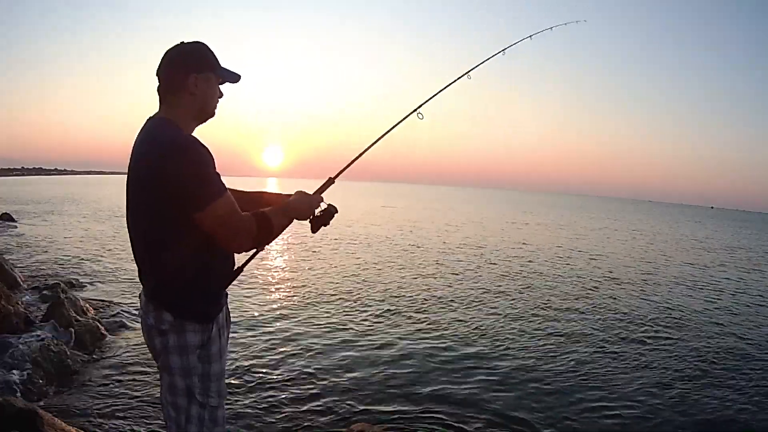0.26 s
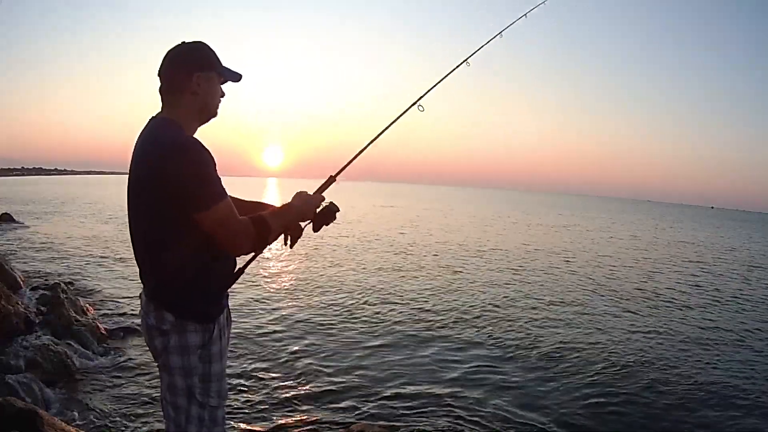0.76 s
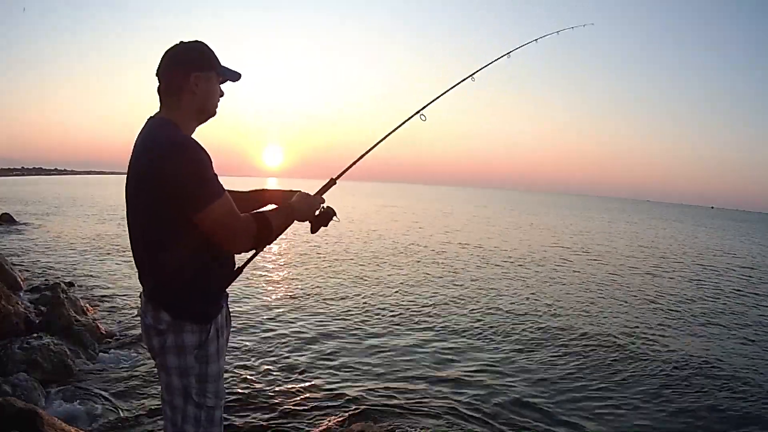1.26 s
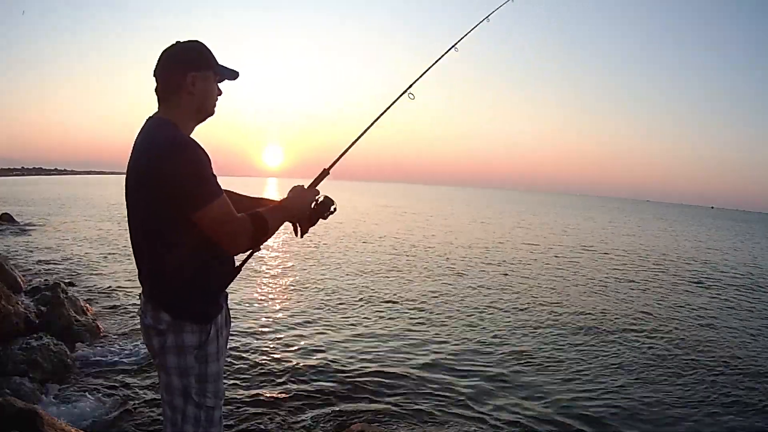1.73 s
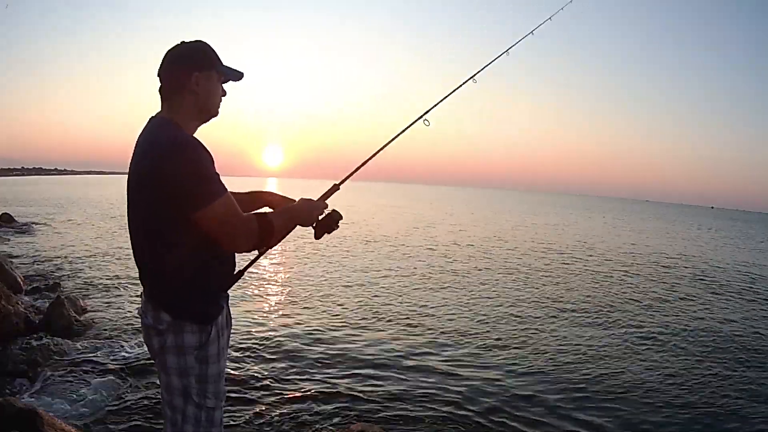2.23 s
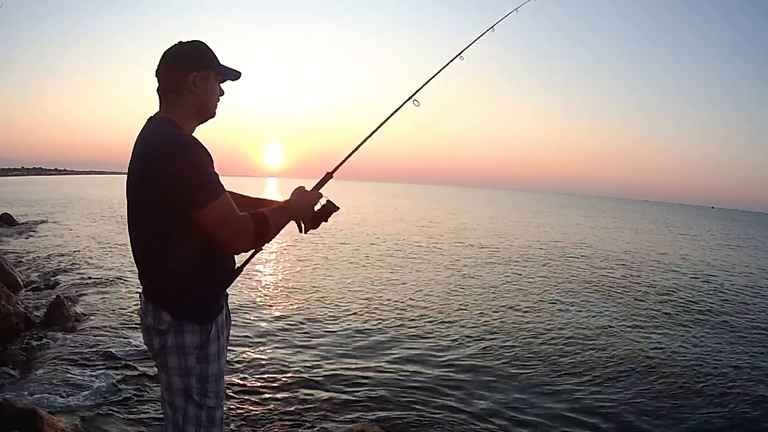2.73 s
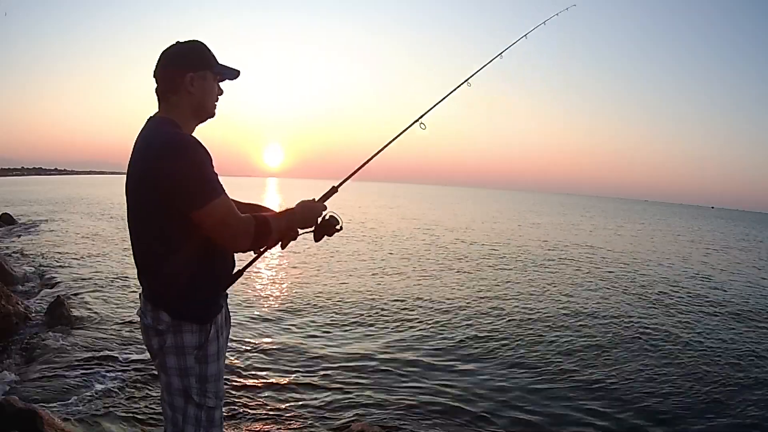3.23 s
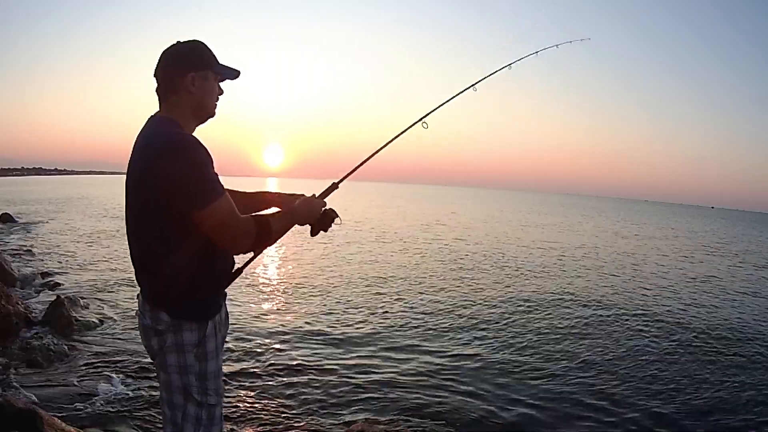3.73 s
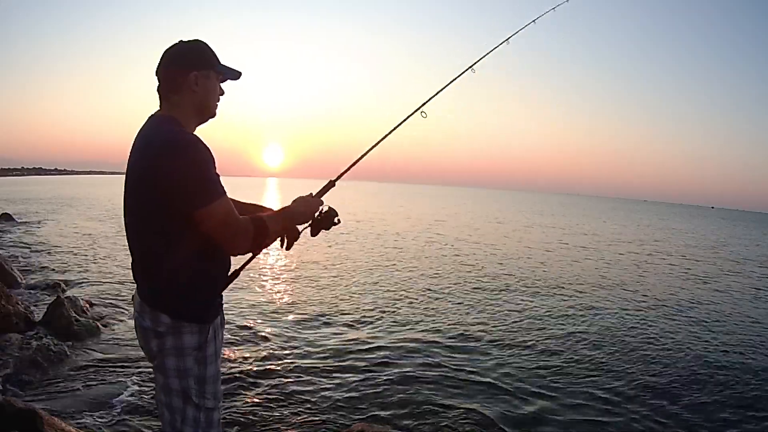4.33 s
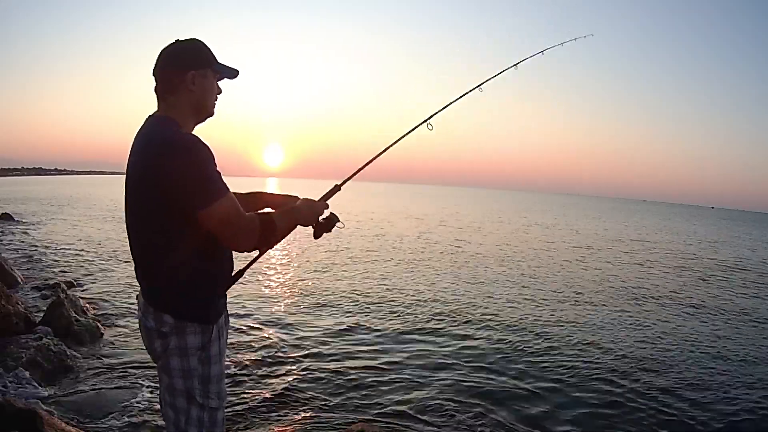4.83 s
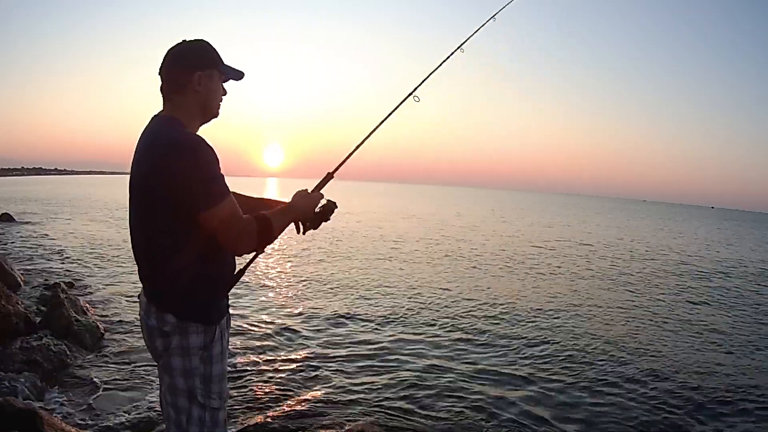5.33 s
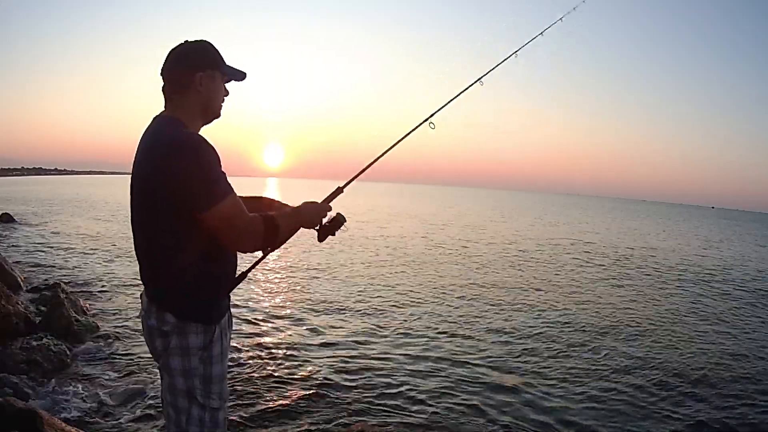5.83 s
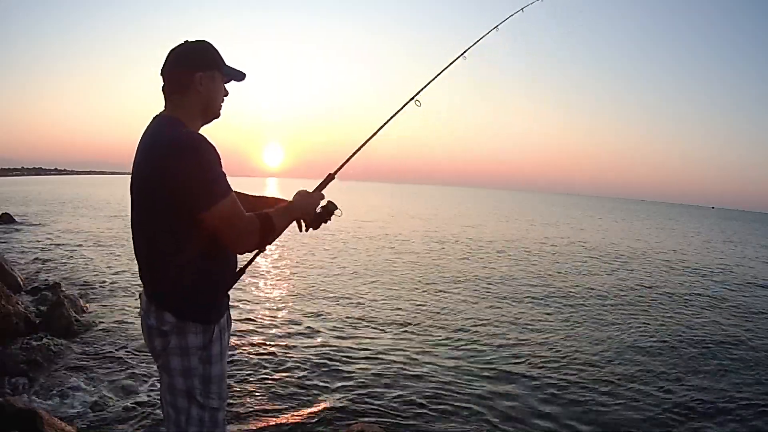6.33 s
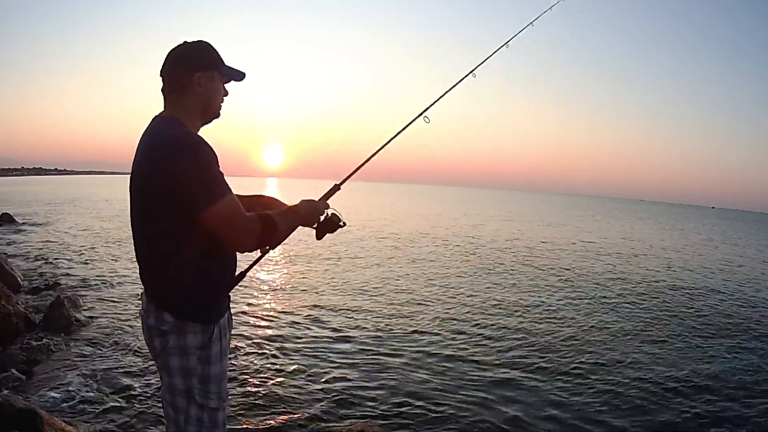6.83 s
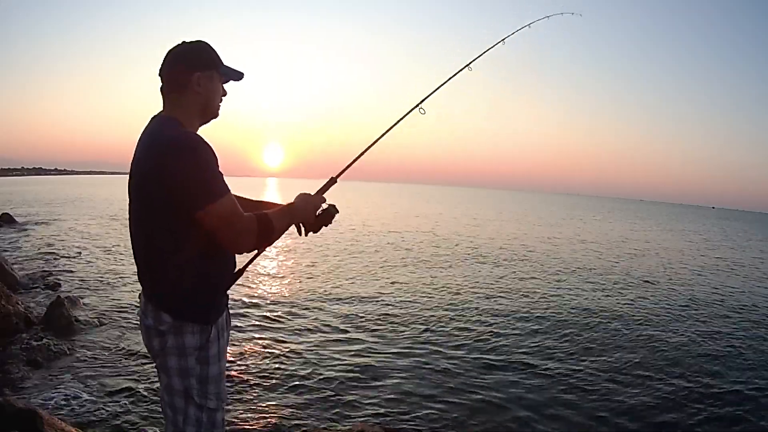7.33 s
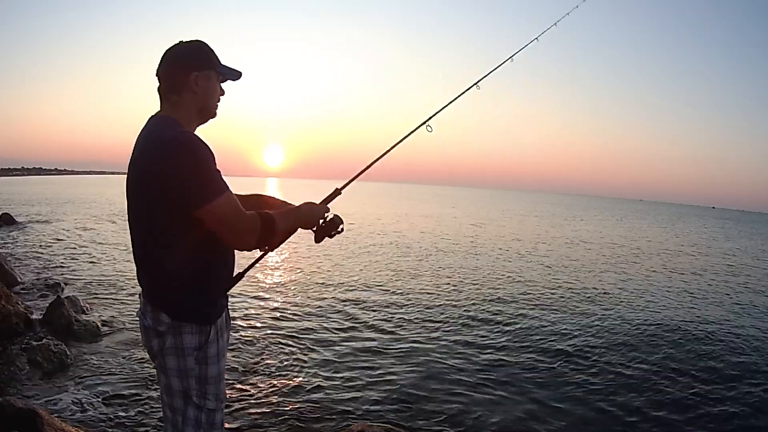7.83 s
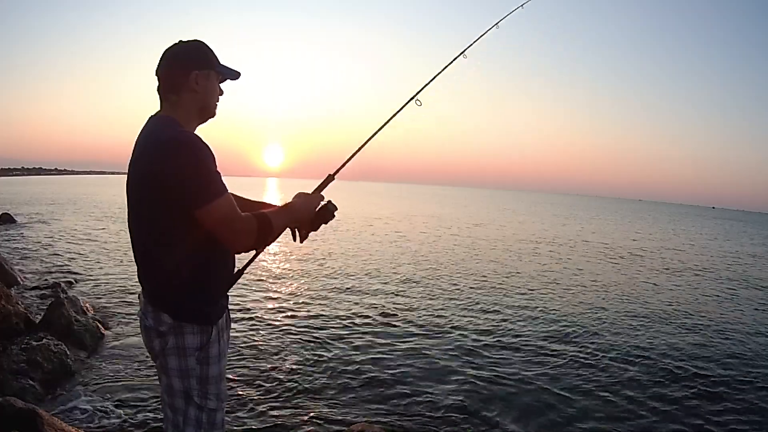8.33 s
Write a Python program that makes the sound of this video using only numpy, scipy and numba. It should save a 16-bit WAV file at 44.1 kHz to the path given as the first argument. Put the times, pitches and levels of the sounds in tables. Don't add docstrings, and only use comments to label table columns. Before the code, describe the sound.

Small waves lap on rocks close by in a continuous bubbly wash, coloured hollow around 900 Hz. Rounded plops, deeper gulps, drips and brief spray slaps come irregularly, thickest between two and four seconds and again around seven. The water thins near five seconds. A light breeze rumbles low on the boxed-in camera microphone. Outdoors, mono, slightly muffled.

```python
import sys
import numpy as np
from scipy import signal
from scipy.fft import rfft, irfft
from scipy.io import wavfile
from scipy.ndimage import uniform_filter1d, map_coordinates
from numba import njit

SR = 44100
rng = np.random.default_rng(int(sys.argv[2]) if len(sys.argv) > 2 else 0)


def gain_from_db(level_db):
    decades = np.asarray(level_db, float) / 20
    return 10 ** decades


def inscribe(sig):
    pcm = np.round(np.clip(np.atleast_2d(sig).T, -1, 1) * 32767)
    wavfile.write(sys.argv[1], SR, pcm.astype(np.int16))


N = 377919
TIME = np.arange(N) / SR
COARSE = 64


def unit(x):
    return x / np.sqrt(np.mean(x ** 2))


def columns(table):
    s, *values = np.transpose(table)
    return [np.interp(TIME, s, v) for v in values]


def bump(s, length_s):
    return .5 ** ((2 * (TIME[::COARSE] - s) / length_s) ** 2)


def full(x):
    return np.interp(TIME, TIME[::COARSE], x)


def walk(rate_hz):
    k = int(SR / rate_hz)
    held = np.repeat(rng.standard_normal(600), k)[:N]
    return unit(uniform_filter1d(uniform_filter1d(held, k), k))


def tint(x, points):
    hz, db = np.transpose(points)
    grid_hz = np.arange(2049) * SR / 4096 + 1
    cep = irfft(np.interp(np.log(grid_hz), np.log(hz), db) * np.log(10) / 20)
    cep[1:2048] *= 2
    cep[2049:] = 0
    return signal.fftconvolve(x, irfft(np.exp(rfft(cep))))[:N]


def band(x, lo_hz, hi_hz, order=2):
    return signal.sosfilt(signal.butter(order, [lo_hz, hi_hz], "band", fs=SR, output="sos"), x)


def even(x, share=.7, span_s=.11):
    span = int(span_s * SR)
    slow = uniform_filter1d(uniform_filter1d(x ** 2, span), int(span_s * SR / 2))
    return unit(x / (np.abs(slow) + 1e-12) ** (share / 2))


@njit
def ring(n, start, turn, cycles, rise, size, swell):
    out = np.zeros(n)
    for k in range(len(start)):
        phase, step, i = 0., turn[k], int(start[k])
        while phase < cycles[k] and i < n and step < .45:
            attack = np.sin(np.pi / 2 * min(phase / swell, 1.)) ** 2
            fade = np.exp(-5.76 * phase / cycles[k])
            out[i] += size[k] * attack * fade * np.sin(2 * np.pi * phase)
            phase += step
            step *= 1 + rise[k] * step
            i += 1
    return out


def bubbles(s, db, hz, cycles, rise):
    return ring(N, s * SR, hz / SR, np.clip(cycles, 1, 60), 1. * rise, gain_from_db(db), 1.28)


def hiss():
    return gain_from_db(-74) * rng.standard_normal(N)


# t/s, buffet level/dB, length/s, upper rumble re buffet/dB
GUSTS = [(.11, -39, 0.15, -12), (0.266, -41.5, .1, -12), (0.486, -49, .1, -20), (0.702, -40.5, 0.13, -11),
         (1.18, -44, .15, -8), (1.36, -49, 0.13, -5.5), (1.55, -44, 0.32, -16), (1.894, -45, 0.053, -11),
         (2.164, -40, 0.29, -7), (2.352, -42.5, 0.12, 1.5), (2.653, -38.5, 0.61, -9),
         (3.28, -39.5, 0.16, 1), (3.453, -39, 0.11, -13), (3.894, -41, 0.31, -12), (4.13, -37, 0.21, -4),
         (4.5, -40.5, 0.2, -10), (4.833, -39.5, .3, -15), (5.147, -54, 0.12, -14), (4.67, -42, 0.085, -3),
         (6.62, -49, .12, -3), (5.397, -51, 0.16, -11), (5.667, -37.5, 0.12, -14), (5.873, -34, 0.23, -8),
         (6.066, -37, 0.28, -14), (6.473, -47, 0.33, -7), (6.83, -48, 0.24, -8.5), (7.194, -43, 0.13, -20),
         (7.61, -50, .25, -13), (7.94, -49, 0.22, -15), (8.136, -60, 0.18, -7.5), (8.323, -41, 0.075, 1.5),
         (8.46, -50, 0.31, -3)]
# t/s, depth/dB, width/s
DENTS = [
    (.69, -23.5, 0.015),
    (3.255, -25.5, 0.016),
    (3.315, -25, 0.019),
    (5.859, -30, 0.0098),
    (5.886, -19.5, 0.005),
    (5.896, -15.5, 0.01),
    (8.475, -26, .015),
]


def breeze(flutter_db=3.5, low_gain_db=0.5, upper_gain_db=-4.5, narrow=0.78):
    calm_db, calm_upper_db = -48, -61
    buffet = full(gain_from_db(calm_db) + sum(gain_from_db(db) * bump(s, length_s) for s, db, length_s, _ in GUSTS))
    bite = full(gain_from_db(calm_upper_db) + sum(gain_from_db(db + up_db) * bump(s, narrow * length_s)
                                         for s, db, length_s, up_db in GUSTS))
    eddies = rng.standard_normal(N) * (rng.random(N) < 400 / SR)
    low = buffet * gain_from_db(low_gain_db - 2.5) * even(band(band(eddies, 11, 43), 5.5, 98))
    rumble = even(band(band(eddies, 68.4, 134), 42, 270))
    upper = bite * gain_from_db(upper_gain_db + flutter_db * walk(24)) * rumble
    dents = sum(-gain_from_db(db) * np.exp(-8 * ((TIME - s) / width_s) ** 2) for s, db, width_s in DENTS)
    return low + upper + band(dents, 8, 400, order=1)


# t/s, wash level/dB, brightening froth/dB
SWELL = [(0, -36, 4.5), (.6, -35.5, 0), (1.1, -32.5, 6), (1.3, -31, 5), (1.98, -29.5, 3.5),
         (2.13, -31.5, 0.5), (2.65, -32.5, -2.5), (3.4, -33.5, -2.5), (3.75, -34.5, -3), (4.4, -40.5, 3),
         (5.2, -42.5, 9), (5.46, -39, -3), (5.62, -36, -1.5), (5.85, -36, 1), (6.4, -41, 4),
         (7.0, -38.5, -2), (7.6, -33, -3.5), (8.15, -33.5, 8)]
# t/s, rise/dB, length/s
SURGES = [(0.67, 2, 0.086), (2.374, 3.5, 0.14), (2.86, 3, 0.16), (3.1, 2.5, 0.074), (3.235, 3.5, 0.19),
          (3.55, 2.5, 0.19), (4.1, -3, 0.094), (4.762, -2.5, 0.11), (1.6, -1, 0.08), (4.7, -0.5, 0.064),
          (7.42, -3, 0.056), (8.53, -2.5, 0.1), (.8, 1, 0.16), (3, -0.5, .12), (1.68, 0.5, 0.14),
          (2.7, -2.5, 0.055), (2.7, 0.5, 0.049), (7.33, -1.5, 0.034), (6, -1.5, 0.043), (2.04, 0.5, 0.093),
          (4.8, 0.5, 0.098), (5.78, 1, 0.071), (6.61, 4, 0.09), (7.4, 0, 0.089), (7.14, 3, 0.075),
          (7.51, 1, 0.049), (7.967, 0, 0.079)]
# dB per swell dB, dB per froth dB, dB per surge dB
FOLLOW = [
    (1.05, -0.16, 1.0),
    (1.0, 0, 0.8),
    (0.78, -0.04, 1),
    (1.02, .5, 1),
    (1.0, 0.5, 1.2),
]


def size_levels():
    swell, froth = columns(SWELL)
    surge = full(sum(db * bump(s, length_s) for s, db, length_s in SURGES))
    rows = [a * swell + b * froth + c * surge for a, b, c in FOLLOW]
    shared, fizz = walk(30), walk(55)
    depths_db = [(.3, 0.14, 2.7), (.3, 0.64, 0.11), (.5, 0.33, 0.3), (.6, 0.25, 0.3), (.7, 0.84, 0.1)]
    levels = []
    for row, (shared_db, fizz_db, own_db) in zip(rows, depths_db):
        mean_db = 20 * np.log10(np.sqrt(np.mean(gain_from_db(row) ** 2)))
        levels.append(row - mean_db + shared_db * shared + fizz_db * fizz + own_db * walk(25))
    return np.array(levels)


SIZE_HZ = [180, 800, 1450, 2500, 9000]
# f/Hz, gain/dB
COLOUR = [(79, -42), (135, -26), (178, -18.5), (276, -15), (403, -8.5), (905, 0.5), (1300, -10.5),
          (1800, -14.5), (2660, -17), (6370, -35), (7500, -40), (8250, -45), (9100, -41.5), (10300, -46),
          (12200, -43.5), (15600, -47)]


def wash(foam_db=3, scatter_db=2.0, cycles=22, rise=0.005, level_db=-33.5):
    levels_db = size_levels()
    log_sizes = np.log(SIZE_HZ)
    when, pitch, nearness, life = rng.random((34000, 4)).T
    s = when * N / SR
    hz = 130 * 120 ** pitch ** .6
    place = np.interp(np.log(hz), log_sizes, np.arange(len(SIZE_HZ)))
    local_db = map_coordinates(levels_db[:, ::COARSE], [place, s * SR / COARSE], order=1, mode="nearest")
    near_db = -scatter_db * np.log(1.002 - nearness) + 15 * np.log10(hz / 1000)
    cloud = bubbles(s, local_db + near_db, hz, cycles * (.5 + life), rise * life)
    spec = rfft(rng.standard_normal(N))
    log_hz = np.log(np.arange(N // 2 + 1) * SR / N + 1)
    shares = [np.interp(log_hz, log_sizes, row) for row in np.eye(len(SIZE_HZ))]
    foam = sum(gain_from_db(db) * irfft(spec * share, N) for db, share in zip(levels_db, shares))
    return gain_from_db(level_db) * unit(tint(unit(cloud) + gain_from_db(foam_db) * unit(foam), COLOUR))


# t/s, spray burst level before colouring/dB, snap level/dB
SLAPS = [(2.3256, -28.5, -53), (2.3894, -45, -54), (2.5032, -41, -45), (2.7944, -35, -54),
         (2.8794, -28, -56), (3.0604, -45.5, -50), (3.099, -26, -52), (3.5794, -40, -52), (4.43, -50, -53),
         (5.2996, -27, -78), (5.342, -44, -67), (5.49, -34, -61), (5.5634, -33, -51), (5.6244, -32, -54),
         (5.704, -50, -56), (5.7763, -33, -54), (5.956, -31, -57), (6.5164, -32, -64), (6.546, -31, -68),
         (6.553, -30.5, -62), (7.028, -33, -66), (2.339, -31, -58), (2.396, -31, -60), (2.41, -34, -62),
         (2.81, -34, -62), (2.915, -35, -62), (6.525, -37, -66), (7.12, -36, -64), (7.16, -37, -62),
         (2.466, -30, -58), (2.86, -29, -58), (7.104, -35, -60), (6.367, -33, -62.5), (6.59, -36, -64),
         (6.61, -40, -60), (6.6534, -48, -54), (6.905, -32, -53), (6.9454, -47.5, -57), (7.021, -26.5, -59),
         (7.1464, -42, -62)]
# f/Hz, gain/dB
SPRAY = [(300, -10.5), (900, 7), (1600, -3.5), (2700, -4), (4500, -14), (7000, -25.5), (9000, -34),
         (15000, -34)]


def slaps(gain_db=5, rise_s=0.003, fade_s=0.056, snap_s=0.014):
    age_s = np.arange(8192) / SR
    burst_shape = np.minimum(age_s / rise_s, 1) * 1000 ** (-age_s / fade_s)
    snap_shape = 1000 ** (-age_s / snap_s)
    burst, snap = np.zeros(N + 8192), np.zeros(N + 8192)
    for s, db, snap_db in SLAPS:
        start = int(s * SR)
        burst[start:start + 8192] += gain_from_db(db) * burst_shape
        snap[start:start + 8192] += gain_from_db(snap_db) * snap_shape
    spray = gain_from_db(gain_db) * tint(burst[:N] * rng.standard_normal(N), SPRAY)
    return spray + band(snap[:N] * rng.standard_normal(N), 4500, 15000)


# t/s, peak level/dB, f/Hz, fade/cycles, pitch rise per cycle
GULPS = [(.678, -32, 208, 12, 0), (1.16, -21, 580, 20, 0.00039), (2.336, -26, 240, 9.2, 0.0035),
         (2.806, -33.5, 255, 25, 0), (2.875, -25, 378, 24, 0.047), (3.098, -23.5, 230, 10.5, 0.00076),
         (3.101, -21.5, 332, 9.5, 0), (4.387, -35, 397, 24, 0.0068), (4.551, -29.5, 670, 22, 0.015),
         (4.588, -32.5, 530, 24, 0.0000066), (5.07, -34, 384, 44, 0.0054), (7.056, -38, 285, 69, 0.019),
         (7.101, -25.5, 626, 19, 0.025), (7.516, -28, 663, 21, 0.0022), (7.773, -24.5, 400, 32, 0.0014),
         (3.1005, -17, 800, 2.5, 0), (7.7696, -9.5, 570, 7.5, 0), (7.09, -31, 480, 20, 0.032),
         (6.8, -37, 290, 17, 0.0051), (5.72, -34, 450, 20, .01), (5.8, -31, 600, 26, 0)]
# t/s, peak level/dB, f/Hz, fade/cycles
PLOPS = [(6.673, -23, 950, 16), (7.057, -30, 1100, 24), (7.107, -24, 845, 20), (7.147, -26, 960, 17),
         (2.366, -15, 800, 13), (2.375, -23, 800, 8.6), (7.801, -23, 920, 12), (6.566, -24, 950, 10),
         (.547, -22.5, 927, 48), (.627, -16, 980, 20), (.995, -24.5, 905, 36), (1.111, -33, 930, 31),
         (1.322, -26, 870, 16), (1.579, -38, 870, 23), (2.236, -13, 916, 23), (2.347, -18, 820, 23),
         (2.432, -19, 776, 14), (2.444, -19, 830, 13), (2.759, -19, 780, 14), (2.794, -17.5, 1000, 26),
         (2.8375, -14, 817, 30), (2.911, -21, 880, 22), (3.269, -18, 890, 36), (3.679, -14, 830, 10.5),
         (3.947, -25.5, 850, 23), (3.991, -18, 976, 14), (4.19, -25, 945, 16), (5.2995, -13.5, 795, 11),
         (5.53, -22, 872, 66), (5.666, -24, 870, 24), (7.02, -27, 925, 23), (7.219, -23, 880, 28),
         (7.444, -24.5, 795, 25), (7.485, -21.5, 920, 26), (7.555, -19, 970, 16), (7.782, -14, 930, 12),
         (7.282, -25, 870, 28), (1.827, -14.5, 900, 21)]
# t/s, peak level/dB, f/Hz
DRIPS = [(0.511, -30, 1400), (2.0, -32, 2070), (2.339, -34, 1980), (2.408, -25, 1440), (2.769, -26, 1570),
         (2.808, -28.5, 1880), (3.101, -22, 1260), (3.711, -30.5, 1310), (3.809, -34, 2650),
         (4.64, -34, 1480), (4.852, -38, 2340), (5.617, -35, 2020), (5.956, -36.5, 3230),
         (7.028, -39, 2600), (6.368, -40, 2220), (6.4, -45, 3000), (6.42, -38, 3100), (6.513, -22.5, 1244),
         (6.547, -31, 2680), (6.547, -30, 1470), (6.908, -41, 2820), (7.027, -26.5, 1700),
         (7.112, -26, 1210), (7.149, -29, 1520), (7.172, -28, 1250), (7.701, -32.5, 2750),
         (7.77, -35, 3300), (.5432, -37, 2180), (.826, -32.5, 2020), (.9308, -34, 2100),
         (1.4012, -32, 2200), (2.6015, -36, 2550), (3.5588, -35.5, 2230), (3.7723, -39, 2040),
         (3.8616, -39, 2370), (3.9215, -35, 2060), (4.1155, -39, 2540), (4.3216, -42.5, 2440),
         (4.4588, -43, 2050), (5.1931, -41, 2140), (5.4625, -40, 2560), (5.7623, -39, 3080),
         (5.9399, -33, 2600), (6.0606, -36, 2000), (6.9885, -38, 2490), (7.2759, -38, 2580),
         (7.6395, -39.5, 2920), (7.9578, -32.5, 2540), (7.9818, -32, 2410), (8.1938, -34, 2760),
         (8.311, -34, 2530), (2.86, -37, 3600), (2.909, -29, 1480)]
# t/s, peak level/dB, f/Hz
DROPLETS = [(.674, -53, 4600), (1.409, -41, 5400), (2.339, -54, 6130), (2.408, -41, 4640),
            (2.8065, -37, 4150), (2.811, -38, 4700), (2.845, -40, 4640), (2.895, -38.5, 4600),
            (3.062, -44, 6500), (3.272, -42.5, 6570), (3.587, -37, 6200), (4.111, -45.5, 6200),
            (4.334, -49, 4330), (4.617, -54, 4640), (4.855, -47, 4040), (5.301, -43, 3980),
            (5.622, -46, 5760), (5.679, -44, 5340), (5.777, -48, 4270), (6.015, -49, 5720),
            (6.067, -47, 5340), (6.557, -45, 4800), (6.909, -49, 5340), (7.023, -38, 4600),
            (7.029, -40, 4200), (7.031, -45, 5300), (6.608, -49, 6000), (7.102, -44, 4330)]
# t/s, peak level/dB, f/Hz
TICKS = [(1.3937, -43, 9060), (1.6836, -39, 9470), (1.947, -38, 12200), (2.795, -45, 9200),
         (3.0679, -40, 8080), (3.0999, -44, 9470), (3.1727, -36, 8870), (.5816, -52, 8630),
         (.8864, -48, 9200), (2.3411, -43, 13900), (6.0172, -50.5, 14000), (6.3131, -50, 13300),
         (5.9199, -44, 12300), (5.92, -40.5, 15200), (7.6186, -44, 14000), (5.913, -50, 9500),
         (5.9199, -35, 14000), (6.7361, -46, 12400), (7.6186, -42, 12200), (7.7712, -50, 9030)]


def pockets(echo_db=-14, echo_s=0.032, plop_rise=0.0038, drip_rise=0.00067, drip_s=0.028):
    rows = [*GULPS]
    rows += [(*row, plop_rise) for row in PLOPS]
    rows += [(s, db, hz, drip_s * hz, drip_rise) for s, db, hz in DRIPS]
    rows += [(*row, 58, drip_rise) for row in DROPLETS]
    rows += [(*row, 22, 0) for row in TICKS]
    direct = bubbles(*np.transpose(rows))
    age_s = np.arange(4000) / SR
    rocks = rng.standard_normal(len(age_s)) * np.exp(-age_s / echo_s)
    rocks /= np.sqrt(np.sum(rocks ** 2))
    return direct + gain_from_db(echo_db) * signal.fftconvolve(direct, rocks)[:N]


def scene():
    return (hiss() + breeze() + wash() + slaps() + pockets())[None]


def roll_off(x):
    return signal.sosfilt(signal.butter(12, 15720, fs=SR, output="sos"), x)


def record(dry):
    cut = signal.sosfilt(signal.ellip(10, .2, 60, 15720, fs=SR, output="sos"), dry)
    return roll_off(cut)


dry = scene()
out = record(dry)
inscribe(out)
```